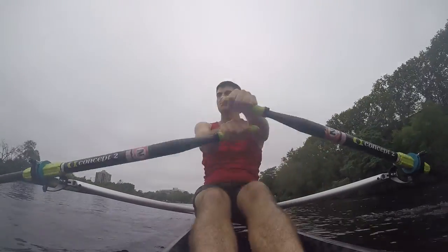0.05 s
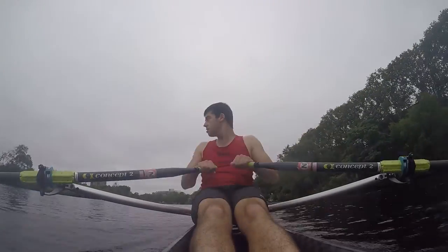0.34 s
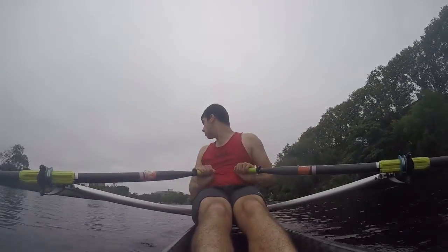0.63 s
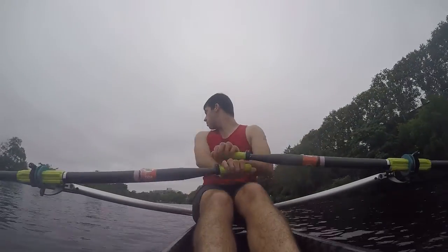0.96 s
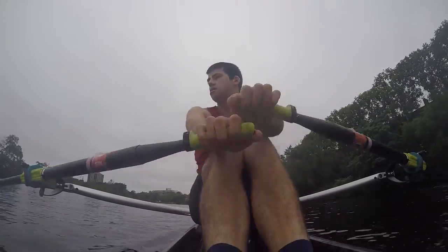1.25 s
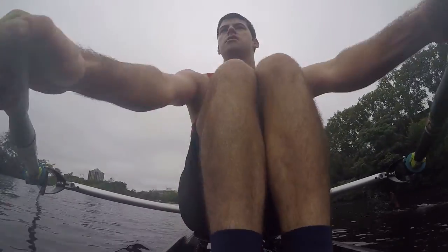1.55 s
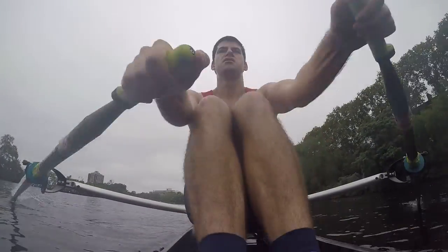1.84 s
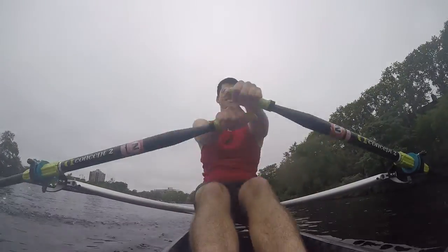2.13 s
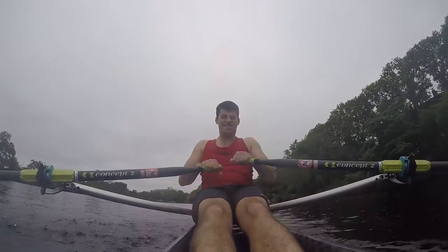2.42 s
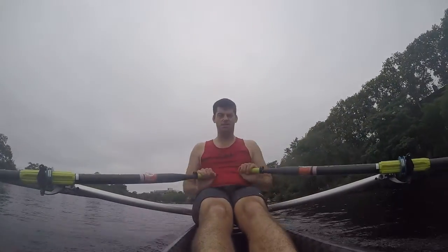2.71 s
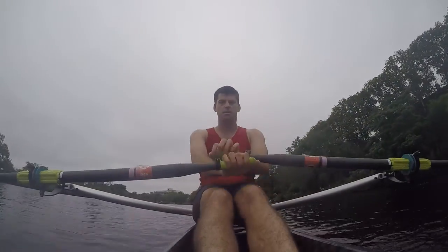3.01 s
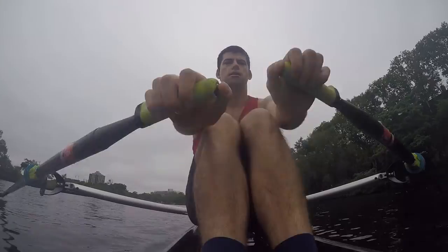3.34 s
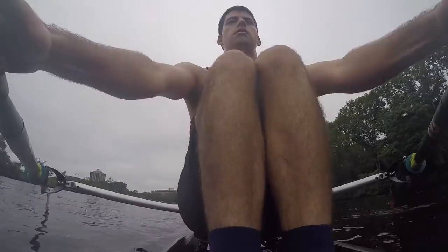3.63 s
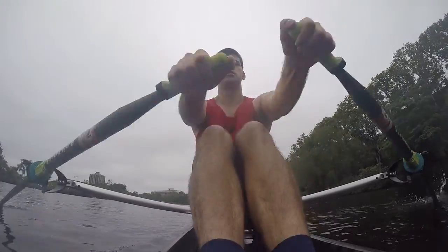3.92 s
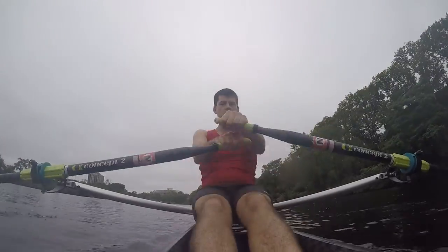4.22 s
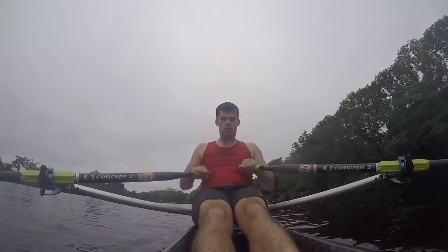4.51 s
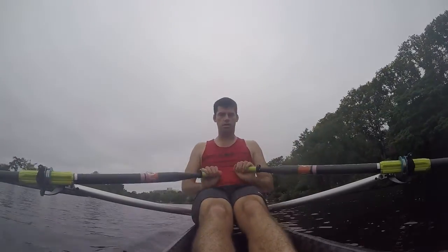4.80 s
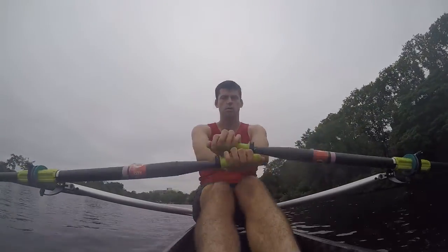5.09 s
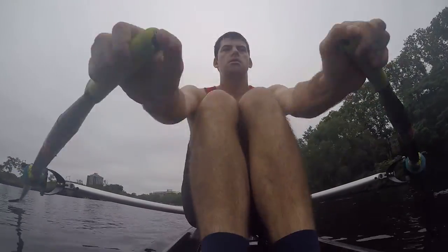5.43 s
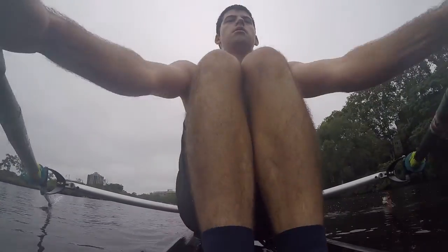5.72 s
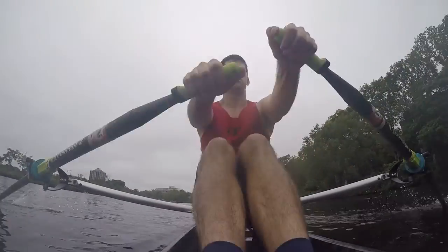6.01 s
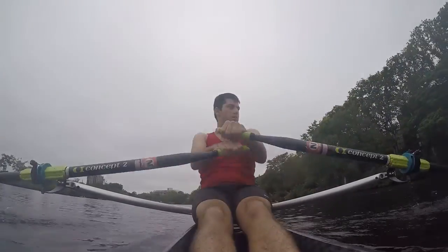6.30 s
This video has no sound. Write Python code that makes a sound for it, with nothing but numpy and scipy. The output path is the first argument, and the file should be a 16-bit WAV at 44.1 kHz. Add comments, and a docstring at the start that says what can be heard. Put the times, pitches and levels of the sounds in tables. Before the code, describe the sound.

A small rowing boat takes three strokes, with oars clacking and creaking in their locks, hollow hull thumps and gurgling water.

```python
"""Calm open water, aboard a single scull, heard through a small cased camera fixed to the stern deck.
The rower takes three strokes. The hollow hull hums and carries each knock to the microphone: blades plunge
in, collars snap under load, the seat bumps at the end of its slide, loose oars clack in their locks, and
the sleeves stick and slip as the blades are squared. Between knocks the seat wheels roll, and bubbles
churn, glug and fizz along the hull."""
import sys
import numpy as np
from scipy import signal
from scipy.fft import rfft, irfft, next_fast_len
from scipy.io import wavfile
from scipy.ndimage import uniform_filter1d, minimum_filter1d

SR = 44100
rng = np.random.default_rng(int(sys.argv[2]) if len(sys.argv) > 2 else 0)


def transcribe(u):
    """Save the signal u as a 16-bit wav file named by the first command-line argument.

    u: samples, shape (n,) or (channels, n), limited to [-1, 1]; the rate is SR.
    q: integer samples, one column per channel.
    """
    v = np.clip(np.atleast_2d(u).T, -1, 1)
    q = np.round(v * 32767).astype(np.int16)
    wavfile.write(sys.argv[1], SR, q)


N = 288855
TIME = np.arange(N) / SR

# Spectra at the microphone: the body of a knock, its treble, and rolling heard through the deck.
# Each row: frequency in Hz, relative level in dB.
BODY_COLOUR = [(100, -18.5), (200, 2.5), (275, 5), (400, 1.5), (550, -6.5), (750, -0.5), (1020, -12.5),
               (1280, -6), (1550, -4.5), (1770, -9.5), (2000, -18.5), (3000, -41), (8000, -69.5)]
TREBLE_COLOUR = [(1000, -29), (2000, 4.5), (2500, 3.5), (3450, -1), (4700, 0), (5000, -10.5), (5300, -5),
                 (6000, -14), (7200, -18.5), (8800, -28), (13000, -35.5), (16000, -39.5)]
ROLL_COLOUR = [(300, -36), (520, -7.5), (720, 1.5), (1000, -6.5), (1280, 0.5), (1650, -10.5), (2000, -27.5),
               (3000, -37), (6000, -75)]
# The finish of each stroke, where the seat judders against the end of its slide.
# Each row: start and length in seconds, relative level in dB, gap between bumps in seconds.
FINISHES = [(0.263, 0.029, -2.5, 0.0098), (2.347, 0.056, 2, 0.014), (4.359, .05, 1, .012),
            (6.413, 0.03, 1.5, 0.013)]


def from_db(db):
    """Decibels to gain."""
    return 10 ** (np.asarray(db) / 20)


def unit(x):
    """Scales to rms 1."""
    return x / np.sqrt(np.mean(abs(x) ** 2) + 1e-20)


def add(mix, s, sound):
    """Lays a sound into the mix at s seconds."""
    part = mix[max(round(s * SR), 0):][:len(sound)]
    part += sound[:len(part)]


def colour_at(colour, hz):
    """Gain of a spectrum, its points joined on a log-frequency axis."""
    f, db = np.transpose(colour)
    return from_db(np.interp(np.log(hz + 1), np.log(f), db))


def tinted(x, colour):
    """Gives a long signal a spectrum, at rms 1."""
    size = next_fast_len(N)
    gain = colour_at(colour, np.fft.rfftfreq(size, 1 / SR))
    return unit(irfft(rfft(x, size) * gain, size)[:N])


def resonance(x, hz, width_hz):
    """The narrow band of x that one mode passes."""
    return signal.lfilter(*signal.iirpeak(hz, hz / width_hz, fs=SR), x)


def drift(per_s):
    """A smooth random wander of rms 1 that changes about per_s times a second."""
    size = next_fast_len(N)
    lowpass = np.exp(-(np.fft.rfftfreq(size, 1 / SR) / per_s) ** 2)
    return unit(irfft(rfft(rng.standard_normal(size)) * lowpass, size)[:N])


def grains(per_s, spread_db):
    """Sparse clicks of either sign, a few much larger than the rest."""
    sizes = from_db(spread_db * np.minimum(rng.exponential(1, N), 4)) * rng.choice([-1, 1], N)
    return unit(sizes * (rng.random(N) < per_s / SR))


def bubbles(per_s, spread_db, low_hz, high_hz, cycles, glide, count=24):
    """A cloud of bubbles at count pitches, each rising a little as it dies."""
    out = np.zeros(N)
    for hz in np.geomspace(low_hz, high_hz, count):
        age = np.arange(round(cycles * SR / hz)) * hz / (cycles * SR)  # 0 to 1
        ping = np.sin(2 * np.pi * cycles * age * (1 + glide * age)) * age * np.exp(-7 * age)
        out += unit(signal.oaconvolve(grains(per_s / count, spread_db), ping)[:N])
    return unit(out)


def note(hz, t60, rise_s, size, glide=0):
    """One mode that swells quickly and rings down, size samples long."""
    t = np.arange(size) / SR
    envelope = from_db(-60 * t / t60) * (1 - np.exp(-t / rise_s))
    return envelope * np.sin(2 * np.pi * hz * t * (1 + glide * t))


def blow(colour, hz, width_hz, skirt_db, scatter, t60, head_s, rise_s, size=4096):
    """A resonance over the colour of its path, then echoes in the hull; rms 1 over its first head_s."""
    f, t = np.fft.rfftfreq(size, 1 / SR), np.arange(size) / SR
    peak = 1 / (1 + (2 * (f - hz) / width_hz) ** 2)
    gain = colour_at(colour, f) * (from_db(skirt_db) + peak)
    cepstrum = irfft(np.log(gain + 1e-7))
    cepstrum[1:size // 2] *= 2  # minimum phase: nothing sounds before the contact
    cepstrum[size // 2 + 1:] = 0
    echoes = rng.standard_normal(size) * from_db(-60 * t / t60) * (1 - np.exp(-t / rise_s))
    paths = 1 + scatter * rfft(echoes) / np.linalg.norm(echoes)
    sound = irfft(np.exp(rfft(cepstrum)) * paths)
    return sound / np.sqrt(np.mean(sound[:round(head_s * SR)] ** 2))


def swell(s, length, rise_s, fall_s):
    """Rises toward time s, holds for length seconds, then dies away."""
    return np.exp(np.minimum(TIME - s, 0) / rise_s - np.maximum(TIME - s - length, 0) / fall_s)


def stroke(idle_db, linger, **part_db):
    """Gain through the strokes: each part stirs a sound by its own dB; linger scales the decay times."""
    # Each row: start and length in seconds, relative level in dB.
    washes = [(.59, 0.026, -0.5), (2.70, 0.13, 0.5), (4.73, 0.1, 0.5)]  # the stern settles and runs through the swirl
    slides = [(1.412, 0.17, -0.5), (3.426, 0.18, -1.5), (5.399, 0.26, -2.5)]  # the seat rolls toward the stern
    catches = [(1.601, 0.051, 1), (1.789, 0.15, 0.5), (3.624, 0.2, 1), (5.634, 0.24, -0.5)]  # the blades drop in and grip
    drives = [(0, 0.0025, 5.5), (1.834, 0.35, 2.5), (3.913, 0.27, -4.5), (6.064, 0.1, 2)]  # the legs push the seat toward the bow
    parts = dict(finish=(FINISHES, 0.013, 0.32), wash=(washes, 0.089, 0.15), slide=(slides, 0.1, 0.021),
                 catch=(catches, 0.014, 0.1), drive=(drives, 0.1, 0.045))
    power = from_db(idle_db) ** 2
    for name, level_db in part_db.items():
        rows, rise_s, base_fall_s = parts[name]
        for s, length, db, *_ in rows:
            power += (from_db(level_db + db) * swell(s, length, rise_s, base_fall_s * linger)) ** 2
    return np.sqrt(power)


def hull(hum_hz=79.3, shaking_db=4.0):
    """The shell hums in its lowest mode, shaken unevenly by the water, over the heave of the boat."""
    # The hum sinks while the blades are loaded. Each row: start and length in seconds, sag in Hz.
    loads = [(1.653, 0.1378, 12.8), (3.688, .45, 19.5), (5.675, 1, 13)]
    # The hum's rise and fall. Each row: time in seconds, relative level in dB.
    hum_level = [(0.0, -21), (0.16, -30), (0.31, -16.5), (0.46, -26.5), (0.62, -12), (0.97, -25),
                 (0.99, -16.5), (1.53, -17), (1.55, -11), (1.9, -19), (1.97, -10.5), (2.13, -26.5),
                 (2.59, -15), (2.94, -13), (3.06, -39), (3.1, -22.5), (3.76, -9.5), (3.79, -18),
                 (3.87, -12), (3.92, -21.5), (4.34, -26.5), (4.41, -12), (4.54, -35.5), (4.83, -11),
                 (4.87, -15), (5.56, -25.5), (5.67, -9.5), (5.73, -16), (5.78, -9), (5.84, -21.5),
                 (6.37, -24), (6.55, -10)]
    # The rumble of the heaving boat. Each row: frequency in Hz, relative level in dB.
    heave_colour = [(10, -17.5), (25, -11.5), (38, -11.5), (55, -2), (80, 1), (130, -39), (300, -80)]
    sag = sum(sag_hz * swell(s, length, 0.0601, 0.0601) for s, length, sag_hz in loads)
    turns = np.cumsum(hum_hz - sag + 2.714 * drift(per_s=11.26)) / SR
    level_db = np.interp(TIME, *np.transpose(hum_level)) + shaking_db * drift(per_s=14)
    hum = from_db(level_db - 0.84) * unit(np.sin(2 * np.pi * turns))
    heaving = stroke(idle_db=-30.5, linger=1.1, wash=-16.5, slide=-23, catch=-24)
    return hum + heaving * tinted(rng.standard_normal(N), heave_colour)


def water():
    """Large bubbles churn under the hull, small ones splash at the blades, tiny ones hiss in spray."""
    # Each row: frequency in Hz, relative level in dB.
    churn_colour = [(60, -26), (105, 5), (150, -3), (200, -1.5), (270, 1.5), (350, -1), (450, -4.5),
                    (560, -13.5), (730, -16.5), (950, -30.5), (1600, -42.5), (4000, -91.5)]  # under the hull
    spray_colour = [(1200, -23.5), (2100, 7.5), (3500, 0.5), (4700, -3), (6000, -17.5), (7000, -19),
                    (8200, -31), (14000, -70)]  # fine spray
    fizz_colour = [(2000, -2.5), (6500, -4), (8200, -10), (11500, -16), (14000, -50)]  # the even fizz of open water
    gurgle = bubbles(per_s=320, spread_db=2, low_hz=112, high_hz=929, cycles=5.13, glide=0.11)
    gurgle += 1.4 * rng.standard_normal(N)
    churning = stroke(idle_db=-35.5, linger=0.62, finish=-30, wash=-21, slide=-29.5, catch=-19,
                      drive=-31.5)
    churn = churning * from_db(2.8 * drift(per_s=34)) * tinted(gurgle, churn_colour)
    drops = bubbles(per_s=900, spread_db=3.2, low_hz=2000, high_hz=10000, cycles=8, glide=0.02)
    drops += 2.2 * rng.standard_normal(N)
    spraying = stroke(idle_db=-62, linger=0.38, finish=-52.5, wash=-53.5, slide=-53, catch=-53.5,
                      drive=-56.5)
    spray = spraying * from_db(1.6 * drift(per_s=34)) * tinted(drops, spray_colour)
    fizz = from_db(-74) * tinted(rng.standard_normal(N), fizz_colour)
    splash = bubbles(per_s=330, spread_db=4.5, low_hz=399.4, high_hz=886, cycles=15, glide=0.12, count=9)
    splash *= stroke(idle_db=-69.5, linger=0.17, wash=-37, catch=-33.5)
    return churn + splash + spray + fizz


def droplets():
    """Drops off the blades tick on the water; small bubbles crackle in the swirl behind them."""
    ticks = bubbles(per_s=160, spread_db=2.5, low_hz=3000, high_hz=8000, cycles=9, glide=0.05)
    ticks *= stroke(idle_db=-78.5, linger=0.86, wash=-61.5, catch=-73.5)
    crackle = bubbles(per_s=200, spread_db=2.5, low_hz=600, high_hz=1350, cycles=10, glide=0.08)
    crackle *= stroke(idle_db=-60, linger=0.31, wash=-34)
    return ticks + crackle


def wheels_and_ripples():
    """Seat wheels on the slide and ripples along the skin whirr through the deck."""
    grit = 0.57 * grains(per_s=1800, spread_db=5) + rng.standard_normal(N)
    waver_db = 1.3 * drift(per_s=18)
    rolling = stroke(idle_db=-52, linger=1, finish=-39.5, wash=-37, slide=-26.5, catch=-41.5, drive=-34)
    return rolling * from_db(waver_db) * tinted(grit, ROLL_COLOUR)


def plops(swell_s=0.0059, glide=0.3):
    """Air dragged under by the blades rings for a few hundredths of a second, rising a little."""
    # Each row: start in seconds, relative level in dB, starting pitch in Hz.
    trapped_air = [(1.6, -23, 670), (1.604, -24, 523), (1.624, -23, 386), (1.897, -22.5, 430),
                   (1.913, -32, 382), (2.693, -21, 896), (2.725, -22.5, 685), (2.746, -17.5, 365),
                   (2.78, -22.5, 543), (3.64, -19.5, 377), (3.642, -21.5, 725), (3.704, -27, 382),
                   (3.73, -18, 512), (3.777, -30, 338), (3.79, -14.5, 345), (3.886, -23, 350),
                   (4.729, -21.5, 537), (4.793, -31, 743), (4.818, -21.5, 570), (5.661, -26, 685),
                   (5.666, -30, 370), (5.746, -25, 525)]
    out, t = np.zeros(N), np.arange(SR // 8) / SR
    envelope = t / swell_s * np.exp(1 - t / swell_s)
    for s, db, hz in trapped_air:
        add(out, s, from_db(db) * envelope * np.sin(2 * np.pi * hz * t * (1 + glide * t)))
    return out


def glugs():
    """Air pockets close behind the lifting blades, each at one low pitch that creeps upward."""
    # Each row: start in seconds, relative level in dB, starting pitch in Hz, seconds to fall 60 dB.
    pockets = [(.475, -11, 248, 0.14), (.607, 0.5, 245.6, 0.12), (0.633, 7, 254, 0.12),
               (.69, -15, 279.3, 0.68), (2.538, -1, 317, 0.041), (2.698, -4.5, 267, 0.19),
               (2.728, 1, 269, 0.094), (2.786, 5, 262, 0.048), (4.674, -6, 314, 0.084),
               (4.731, 3.5, 255, 0.16)]
    out = np.zeros(N)
    for s, db, hz, t60 in pockets:
        add(out, s, from_db(db) * note(hz, t60, rise_s=0.0024, size=SR // 3, glide=0.091))
    return out


def grating(body_db=-25, treble_db=-43):
    """Dense tiny slips crackle through the oarlock as a sleeve turns."""
    # Each row: start and length of a turn in seconds, relative level in dB.
    turns = [(0.01, 0.063, -21), (1.381, 0.018, -1.5), (2.519, 0.1, -1.5), (2.855, 0.043, -2),
             (4.812, 0.082, -1.5)]
    turning = sum(from_db(db) * swell(s, length, rise_s=0.005, fall_s=0.012) for s, length, db in turns)
    slips = grains(per_s=1800, spread_db=1.5)
    body = from_db(body_db) * tinted(slips, ROLL_COLOUR)
    treble = from_db(treble_db) * tinted(slips, TREBLE_COLOUR)
    return turning * (body + treble)


def frame_ring(ring_db=-24):
    """The frame rings on with one clear tone after each finish."""
    out = np.zeros(N)
    tone = note(hz=334, t60=0.82, rise_s=0.0045, size=SR // 2)
    for s, length, db, _ in FINISHES:
        add(out, s + length, from_db(ring_db + db) * tone)
    return out


def seat_judders(middle_db=-15.5, ends_db=-2, hz=242):
    """The seat's quick bumps at each finish, hardest in the middle, as rows of seconds, dB and Hz."""
    return [(s + late, middle_db + db + ends_db * (2 * late / length - 1) ** 2, hz)
            for s, length, db, gap_s in FINISHES for late in np.arange(0, length, gap_s)]


def oar_rattle(tick_db=-25, tock_db=-14, lag_s=0.002):
    """The loose oars tick in their locks with each bump of the seat."""
    out = np.zeros(N)
    for s, db, _ in seat_judders():
        tock = blow(BODY_COLOUR, 1100, width_hz=430, skirt_db=-37.5, scatter=0.28,
                    t60=0.016, head_s=0.0026, rise_s=0.0015)
        tick = blow(TREBLE_COLOUR, 2780, width_hz=550, skirt_db=-20.5, scatter=2.6,
                    t60=0.0099, head_s=0.0099, rise_s=0.0015)
        add(out, s + lag_s, from_db(db + tock_db) * tock + from_db(db + tick_db) * tick)
    return out


def hull_thumps():
    """Feet, blades, water and the juddering seat boom in the hollow shell."""
    # Each row: start in seconds, relative level in dB, resonance in Hz.
    thumps = [(0.552, -19.5, 315), (0.6, -20, 247), (0.967, -27.5, 270), (1.612, -19, 256),
              (1.788, -22, 275), (1.802, -12, 213), (2.695, -15, 292), (2.783, -15.5, 267),
              (3.648, -27.5, 297), (3.733, -21.5, 250), (4.444, -21.5, 247), (4.671, -23, 290),
              (4.798, -11.5, 257), (4.827, -13.5, 252), (5.667, -18, 244), (5.75, -17, 250),
              (5.825, -23.5, 224)]
    # The shell's answer to a dull blow. Each row: frequency in Hz, relative level in dB.
    shell_colour = [(40, -39), (100, 5), (170, -1.5), (270, -5.5), (360, -3), (550, -12.5), (760, 2),
                    (1020, -7), (1350, -14.5), (1750, -15), (2200, -26), (6000, -62.5)]
    out = np.zeros(N)
    for s, db, hz in thumps + seat_judders():
        boom = blow(shell_colour, hz, width_hz=132, skirt_db=-24.5, scatter=0.71,
                    t60=0.058, head_s=0.0087, rise_s=0.003)
        add(out, s, from_db(db) * boom)
    return out


def rigger_pings():
    """Two hard collar snaps set the thin metal of a rigger tube pinging."""
    # Each row: start in seconds, relative level in dB, pitch in Hz.
    pings = [(1.921, -15.5, 3490), (3.794, -13.5, 3490)]
    out = np.zeros(N)
    for s, db, hz in pings:
        add(out, s, from_db(db) * note(hz, t60=0.038, rise_s=0.001, size=SR // 8))
    return out


def collar_snaps(dull_hz=6000):
    """Under the load of the drive, collars snap against the pins: dry clicks with little top."""
    # Each row: start in seconds, body level in dB and pitch in Hz, ring level in dB and pitch in Hz.
    snaps = [(1.755, -13, 1325, -20, 2330), (1.858, -23, 1270, -54, 3500), (1.921, -16, 1260, -20.5, 3500),
             (1.97, -32, 1190, -26.5, 2520), (2.009, -20, 1175, -25.5, 2900), (2.019, -24, 1370, -29, 2850),
             (2.14, -16, 1160, -43, 2410), (3.784, -25, 1130, -35, 3580), (3.795, -15, 1230, -20, 3450),
             (4.03, -26, 1120, -37, 2800), (4.044, -40, 1190, -44, 2900), (3.803, -21.5, 1200, -31, 3500),
             (5.742, -36.5, 1310, -35, 2640), (5.755, -29.5, 1500, -29, 2410),
             (5.912, -28, 1480, -26.5, 2500), (6.02, -22, 1080, -20, 2450), (6.053, -30, 1350, -39.5, 2470),
             (6.103, -23, 1260, -62, 2450), (6.122, -15.5, 1194, -44, 2440)]
    out = np.zeros(N)
    for s, body_db, body_hz, ring_db, ring_hz in snaps:
        body = blow(BODY_COLOUR, body_hz, width_hz=300, skirt_db=-29.5, scatter=0.5,
                    t60=0.014, head_s=0.0073, rise_s=0.003)
        ring = blow(TREBLE_COLOUR, ring_hz, width_hz=400, skirt_db=-6, scatter=2,
                    t60=0.014, head_s=0.007, rise_s=0.0012)
        add(out, s, from_db(body_db) * body + from_db(ring_db) * ring)
    return signal.sosfilt(signal.butter(4, dull_hz, fs=SR, output="sos"), out)


def feather_thuds():
    """The flat of a sleeve drops onto its oarlock; shaft and rigger answer with a woody thud."""
    # Each row: start of a feathering in seconds, relative level in dB.
    feathers = [(0.73, -26), (2.895, -22.5), (4.896, -7.5)]
    # Shaft and rigger modes. Each row: pitch in Hz, relative level in dB, seconds to fall 60 dB.
    modes = [(298, 1.5, 0.04), (735, -8.5, 0.089), (900, -2, .035)]
    out, t = np.zeros(N), np.arange(SR // 8) / SR
    thud = sum(from_db(db - 60 * t / t60) * np.sin(2 * np.pi * hz * t) for hz, db, t60 in modes)
    for s, db in feathers:
        add(out, s, from_db(db) * thud)
    return out


def oar_clacks():
    """Loose oars clack as the blades come out and are feathered, briefly ringing lock or rigger."""
    # Each row: start in seconds, body level in dB and pitch in Hz, ring level in dB and pitch in Hz.
    clacks = [(0.296, -24, 1150, -56, 2700), (0.304, -24.5, 1250, -38.5, 2500),
              (0.462, -30.5, 1160, -42, 4630), (0.55, -24.5, 970, -44.5, 2850),
              (0.631, -22, 1040, -39.5, 4430), (0.724, -16.5, 1650, -23.5, 4420),
              (0.73, -16, 1210, -24, 2070), (0.947, -36, 1000, -60, 2440), (2.364, -18, 822, -34.5, 2600),
              (2.412, -18, 1120, -34, 2770), (2.53, -30, 850, -29.5, 4400), (2.539, -19.5, 900, -27, 4600),
              (2.554, -18, 900, -25.5, 4600), (2.584, -22.5, 1450, -28, 4740),
              (2.784, -24, 1300, -34, 4150), (2.836, -30, 1250, -42, 2400), (2.885, -17.5, 1510, -26, 3660),
              (2.895, -17, 1080, -23, 2150), (2.95, -29, 1050, -58, 2420), (2.989, -25, 990, -51, 2470),
              (4.419, -29.5, 1440, -40.5, 2400), (4.487, -32, 1300, -42, 2280),
              (4.559, -30.5, 1010, -37, 4270), (4.573, -33, 970, -35.5, 4460),
              (4.671, -30.5, 985, -50, 2310), (4.844, -21, 1290, -30, 2500),
              (4.889, -13, 1500, -24.5, 3830), (4.895, -11.5, 1200, -19.5, 2140),
              (5.036, -29, 1190, -36, 2190), (6.385, -44, 1200, -53, 2837),
              (6.445, -25.5, 1140, -39.5, 2760), (6.471, -29, 1170, -34.5, 2860)]
    out = np.zeros(N)
    for s, body_db, body_hz, ring_db, ring_hz in clacks:
        body = blow(BODY_COLOUR, body_hz, width_hz=400, skirt_db=-17, scatter=0.84,
                    t60=0.021, head_s=0.0082, rise_s=0.044)
        ring = blow(TREBLE_COLOUR, ring_hz, width_hz=210, skirt_db=-9, scatter=3,
                    t60=0.017, head_s=0.007, rise_s=0.0012)
        add(out, s, from_db(body_db) * body + from_db(ring_db) * ring)
    return out


def sleeve_chatter(ring_db=-24, ring_t60=0.12, scuff_db=-29):
    """A sleeve sticks and slips in its lock as the blade is squared: bright ticks, then hollow tocks."""
    # Each row: start of a slip in seconds, relative level in dB, voice ("tick" or "tock").
    slips = [(1.053, -21.5, "tock"), (1.08, -11.5, "tick"), (1.098, -10, "tick"), (1.132, -8, "tick"),
             (1.149, -1.5, "tick"), (1.173, -9, "tick"), (1.185, -13, "tick"), (1.195, -13.5, "tick"),
             (1.237, -16, "tock"), (1.244, -9, "tock"), (1.253, -4.5, "tock"), (1.273, -7, "tock"),
             (1.293, -7.5, "tock"), (1.308, -11, "tock"), (1.32, -11.5, "tock"), (1.337, -9, "tick"),
             (1.348, -11.5, "tock"), (1.367, -17, "tock"), (3.114, -7, "tick"), (3.123, -13.5, "tick"),
             (3.15, -11.5, "tick"), (3.166, -14, "tick"), (3.177, -10, "tick"), (3.22, -33, "tock"),
             (3.23, -9.5, "tock"), (3.244, -9.5, "tock"), (3.253, -7.5, "tock"), (3.271, -13.5, "tock"),
             (3.279, -14.5, "tock"), (3.289, -16, "tock"), (3.299, -15, "tock"), (3.309, -16, "tock"),
             (3.318, -25.5, "tock"), (3.333, -15.5, "tick"), (5.076, -14, "tick"), (5.092, -10.5, "tick"),
             (5.108, -12.5, "tick"), (5.125, -7, "tick"), (5.145, -13.5, "tick"), (5.165, -21, "tick"),
             (5.174, -10, "tick"), (5.198, -10.5, "tick"), (5.22, -11, "tock"), (5.23, -8.5, "tock"),
             (5.248, -7.5, "tock"), (5.261, -9, "tock"), (5.273, -10.5, "tock"), (5.283, -16, "tock"),
             (5.293, -15, "tock"), (5.304, -17, "tock"), (5.317, -11, "tock"), (5.326, -13.5, "tock"),
             (5.337, -19, "tock"), (5.347, -19.5, "tock")]
    # The modes of each voice. Each row: pitch in Hz, relative level in dB, seconds to swell.
    modes = {"tick": [(274.6, -10.5, 0.0054), (705, -6.5, 0.0023), (927, -18, 0.0064), (1296, -1.5, 0.0023),
             (1527, -7.5, 0.003), (1817, -21.5, 0.0021), (1955, -23, 0.003), (2565, -37, 0.0045),
             (2730, -28, 0.0027), (3970, -23.5, 0.00088), (4620, -25.5, 0.0026), (5090, -39, 0.0033)],
             "tock": [(280.5, -5, 0.0062), (424, -6.5, 0.0026), (769, -7, 0.0041), (857, 0, 0.0018),
             (1257, -5.5, 0.0021), (1710, -18.5, 0.0025), (2290, -42, 0.0022), (2776, -29, 0.0031),
             (3310, -31, 0.0024), (4190, -28, 0.0015), (4330, -24, 0.0019), (5130, -30, 0.0012)]}
    out, t = np.zeros(N), np.arange(4096) / SR
    for s, db, voice in slips:
        detune = 1 + 0.015 * rng.standard_normal()
        creak = np.zeros(len(t))
        for hz, mode_db, swell_s in modes[voice]:
            age = t / swell_s
            burst = (age * np.exp(1 - age)) ** 3
            ring = from_db(ring_db - 60 * t / ring_t60) * (1 - np.exp(-age ** 2))
            stray_db, phase = rng.normal(0, [2, 0.8])  # each slip catches the modes differently
            tone = np.sin(2 * np.pi * hz * detune * t + phase)
            creak += from_db(mode_db + stray_db) * (burst + ring) * tone
        scuff = blow(TREBLE_COLOUR, 8300, width_hz=2500, skirt_db=3.5, scatter=2.3,
                     t60=0.014, head_s=0.013, rise_s=0.0033, size=2048)
        add(out, s, from_db(db) * creak)
        add(out, s, from_db(db + scuff_db) * scuff)
    return out


def deck(x):
    """The deck under the camera passes the direct sound and adds the short ring of its modes."""
    # Each row: centre and width in Hz, level in dB against the direct path.
    modes = [(277.3, 35, -6.5), (708, 70, -9), (863, 30, -12), (1296, 31, -18)]
    return x + sum(from_db(db) * resonance(x, hz, width_hz) for hz, width_hz, db in modes)


def camera_case(x):
    """The case around the microphone lifts some narrow bands and swallows others."""
    # Each row: centre and width in Hz, gain in dB.
    bands = [(1758, 53, 6.5), (2250, 31, -12), (2433, 27, 5.5), (3405, 100, 6.5), (4446, 74, -0.5),
             (5010, 120, -10), (5300, 200, 4), (6370, 250, 2)]
    for hz, width_hz, db in bands:
        x = x + (from_db(db) - 1) * resonance(x, hz, width_hz)
    return x


def scene():
    """Everything reaches the one microphone through the boat, close, with no room around it."""
    knocks = (from_db(1.6) * oar_clacks() + from_db(-0.3) * collar_snaps() + feather_thuds()
              + from_db(4) * hull_thumps() + frame_ring() + oar_rattle() + rigger_pings())
    flow = (from_db(-5.5) * glugs() + from_db(1) * plops() + from_db(-1.77) * water()
            + from_db(-3) * wheels_and_ripples() + droplets())
    at_stern = deck(knocks + flow + grating()) + from_db(0.5) * sleeve_chatter() + hull()
    return camera_case(at_stern)[None]


def record(dry, ceiling=0.93, edge_hz=15500):
    """The camera's fast limiter holds the peaks, then a steep low-pass takes off the very top."""
    allowed = np.minimum(1, ceiling / (abs(dry) + 1e-9))
    gain = uniform_filter1d(minimum_filter1d(allowed, size=161), size=161)
    lowpass = signal.firwin(511, edge_hz, window=("kaiser", 9), fs=SR)
    return signal.oaconvolve(dry * gain, lowpass[None], "same")


dry = scene()
out = record(dry)
transcribe(out)
```